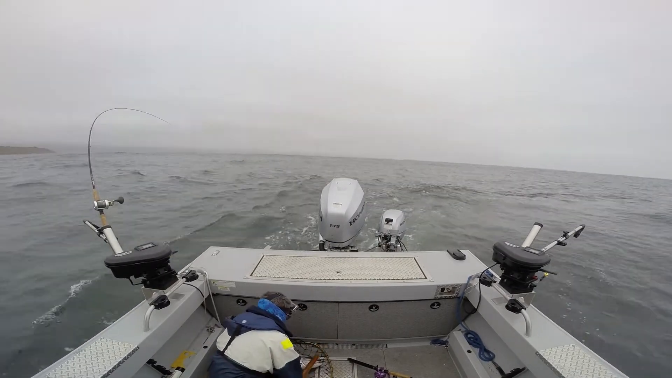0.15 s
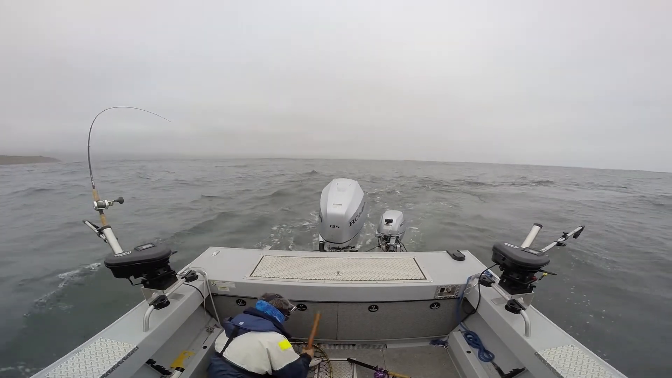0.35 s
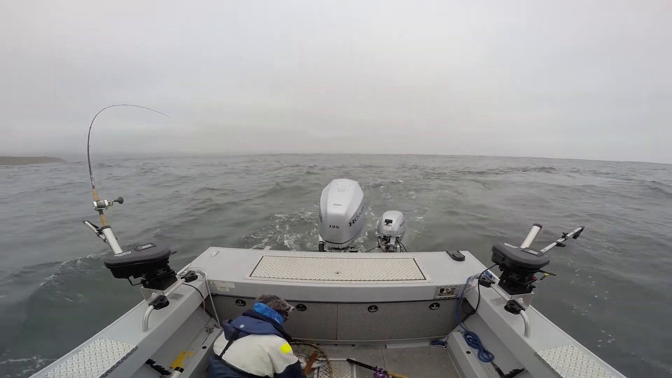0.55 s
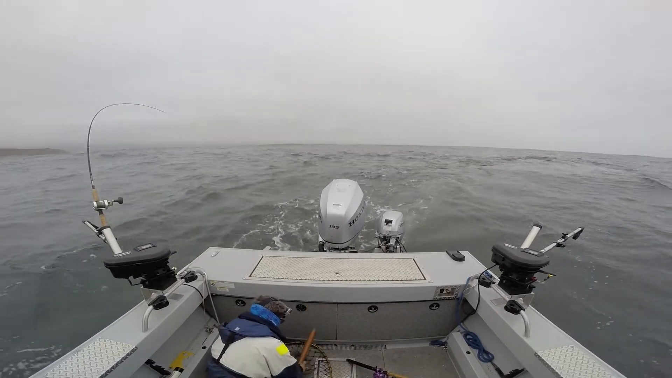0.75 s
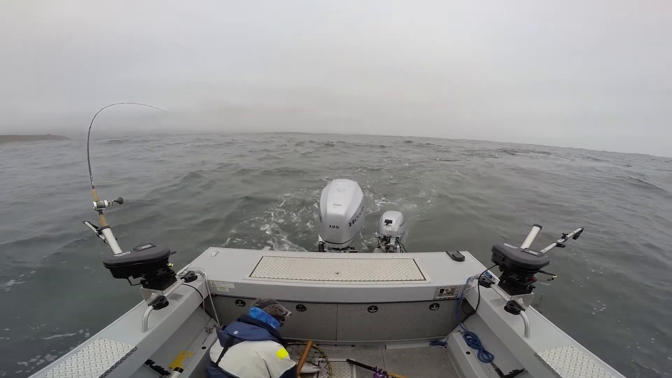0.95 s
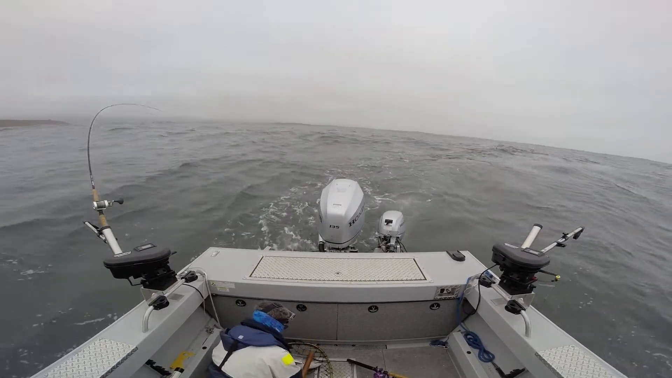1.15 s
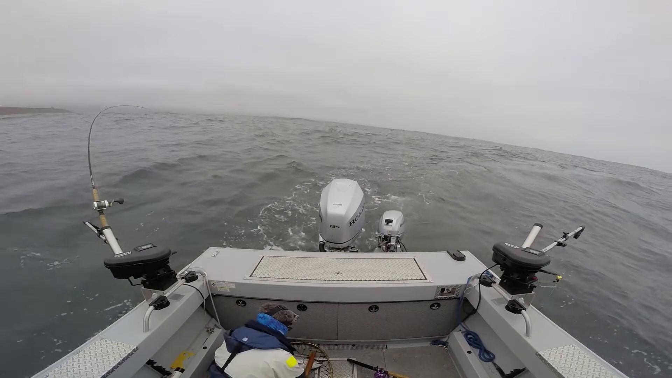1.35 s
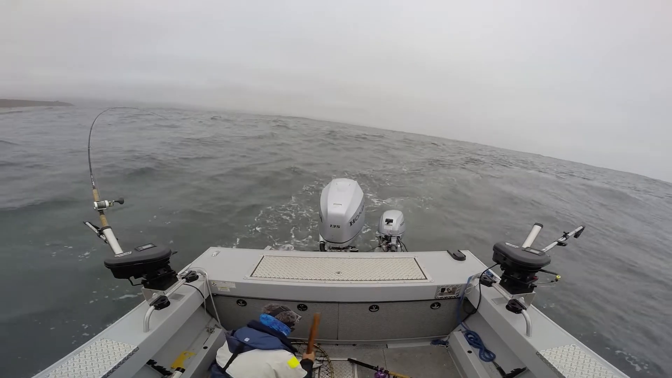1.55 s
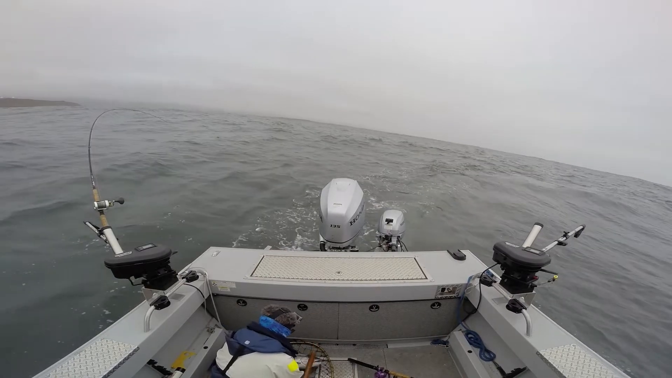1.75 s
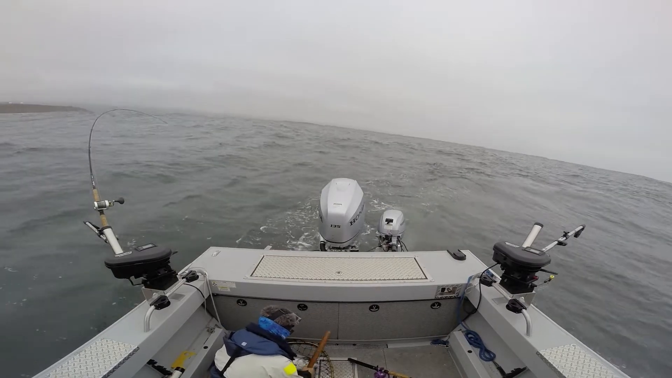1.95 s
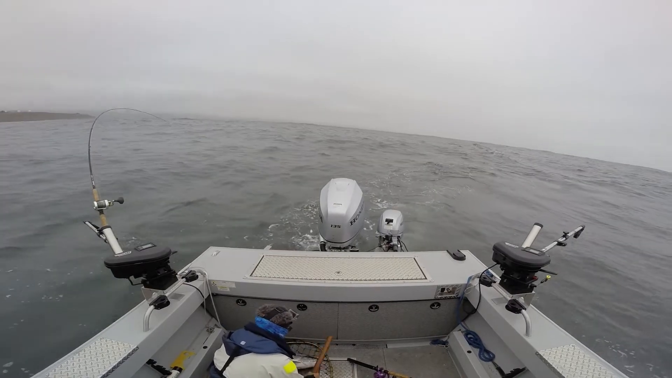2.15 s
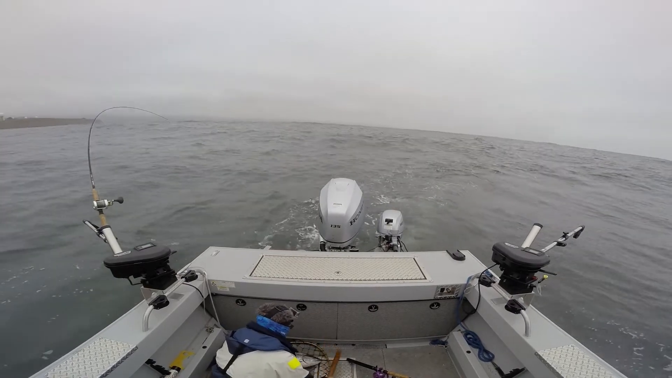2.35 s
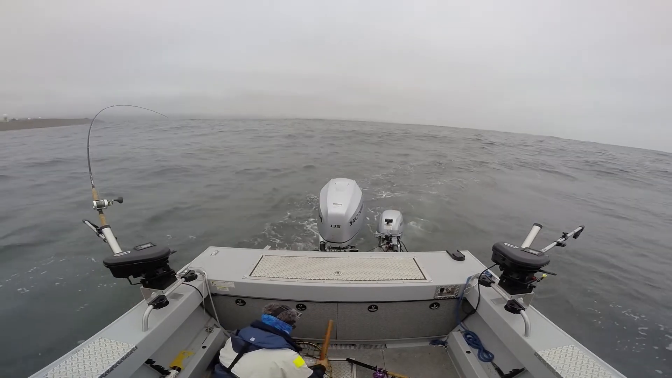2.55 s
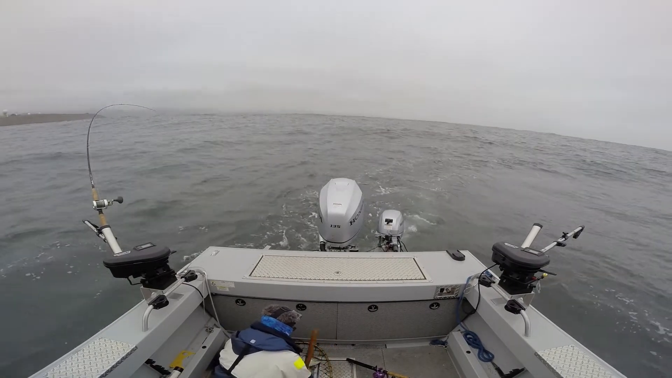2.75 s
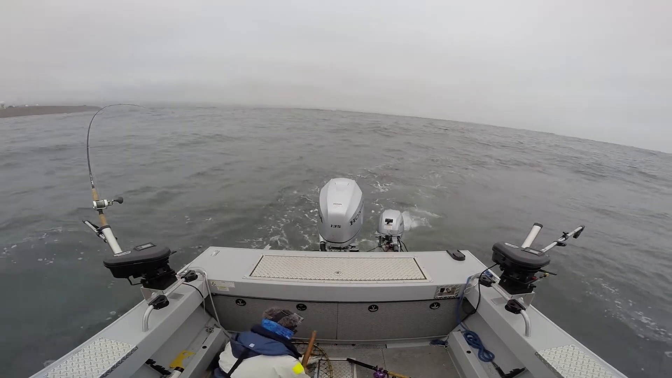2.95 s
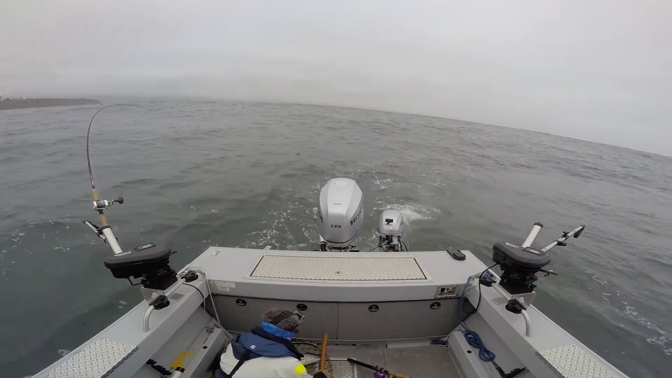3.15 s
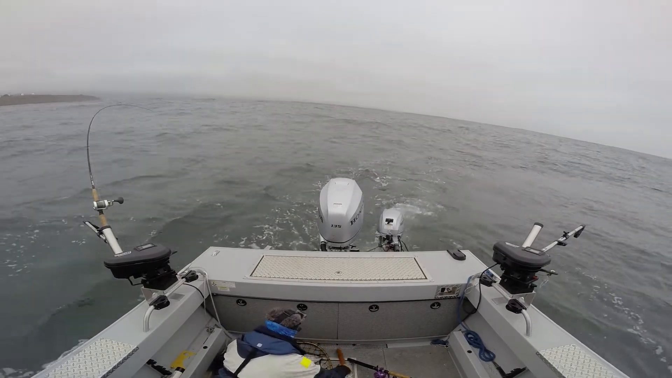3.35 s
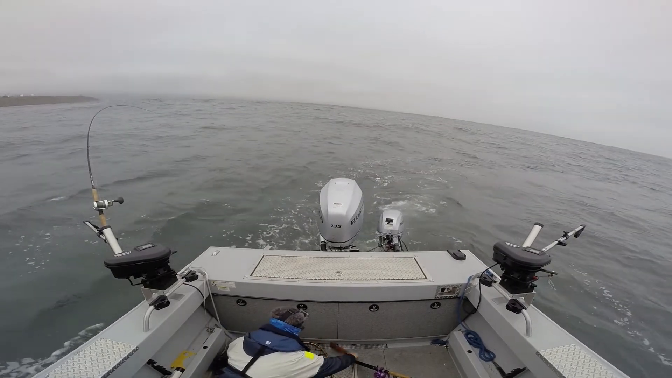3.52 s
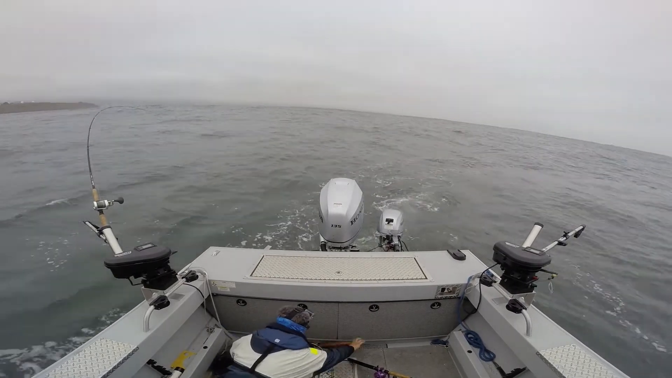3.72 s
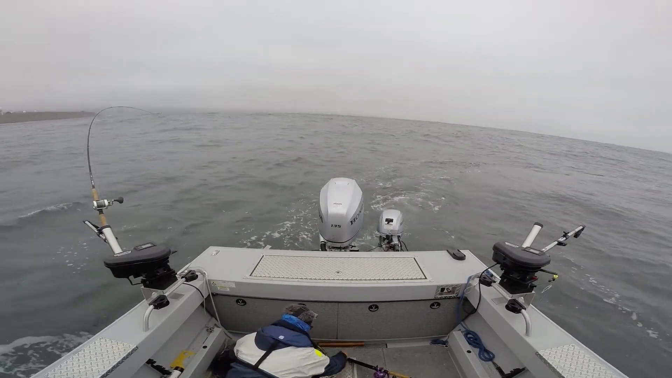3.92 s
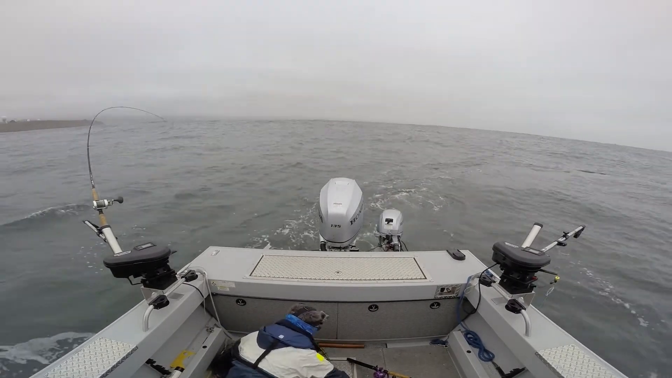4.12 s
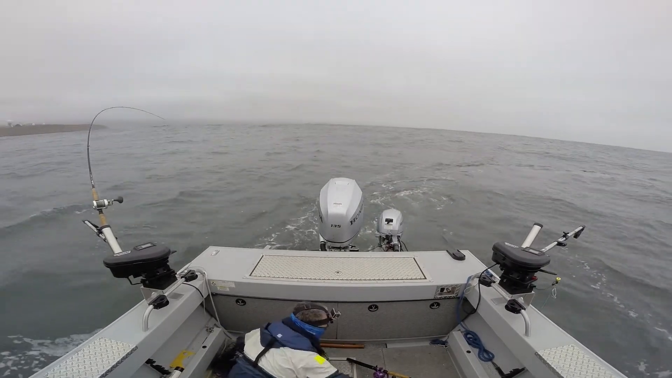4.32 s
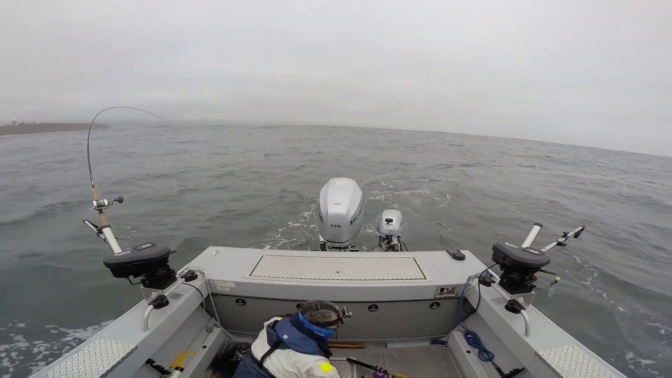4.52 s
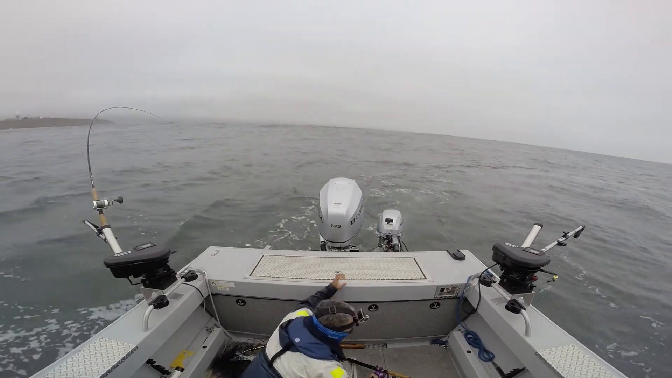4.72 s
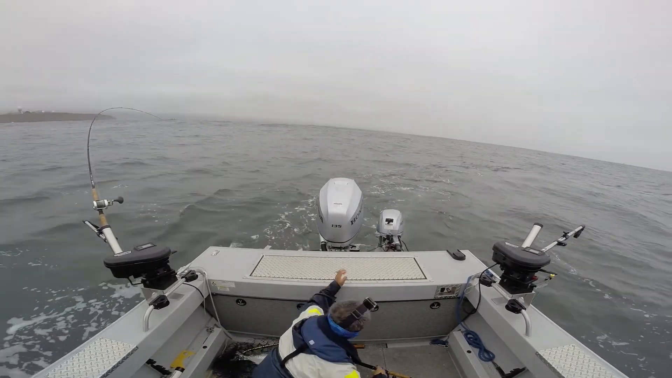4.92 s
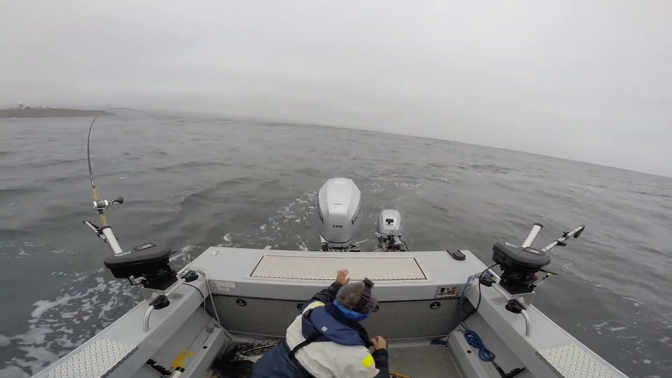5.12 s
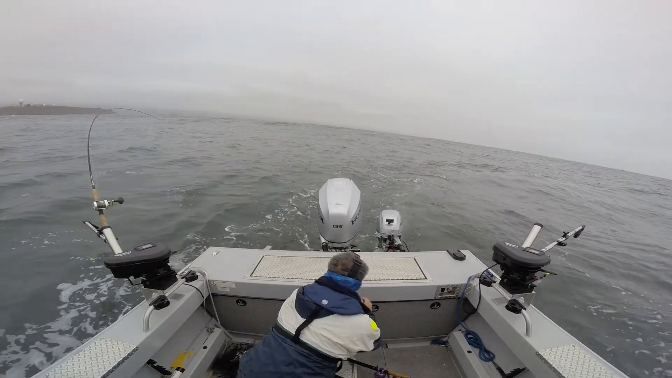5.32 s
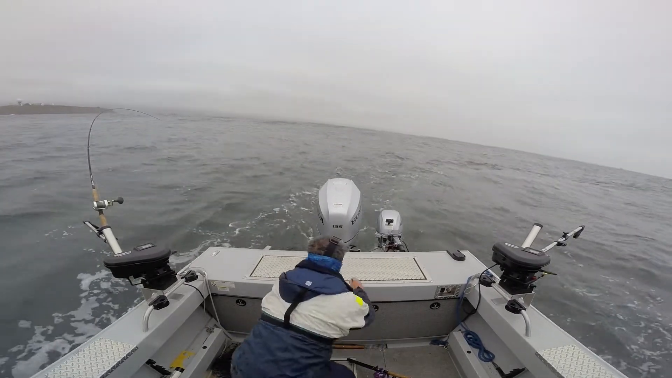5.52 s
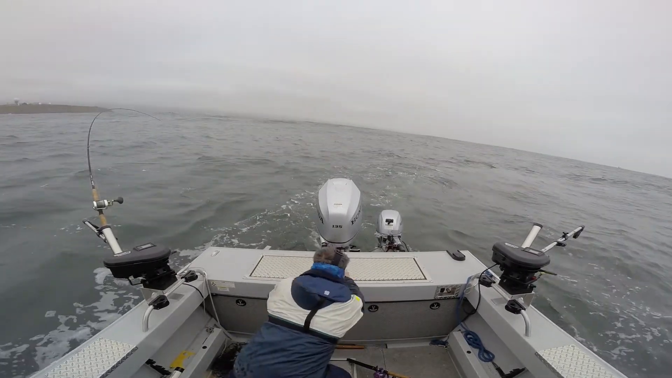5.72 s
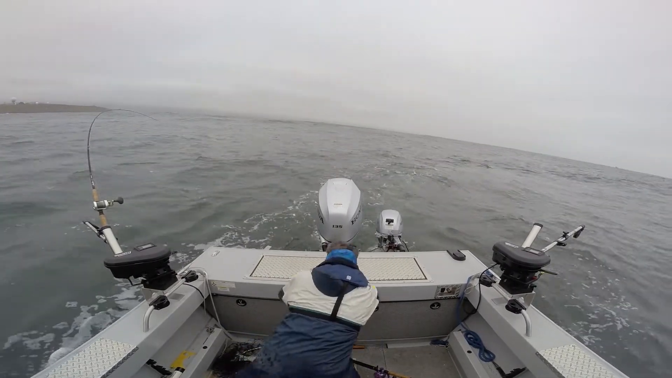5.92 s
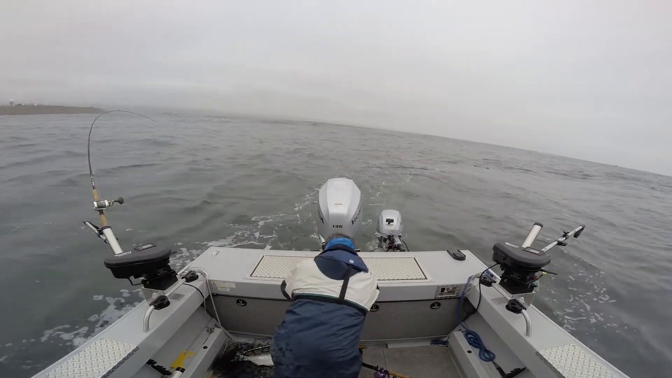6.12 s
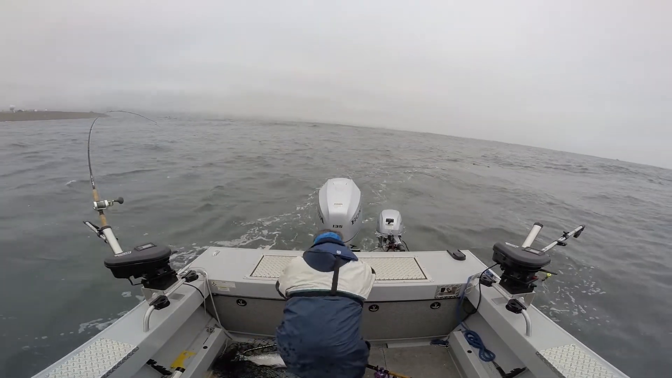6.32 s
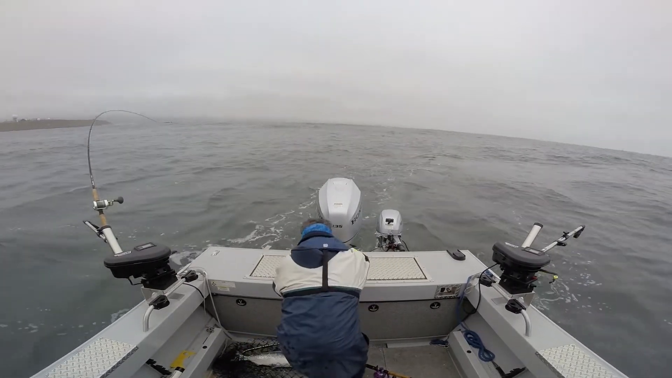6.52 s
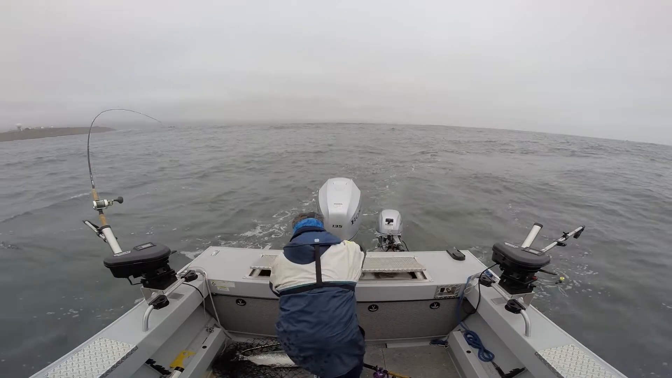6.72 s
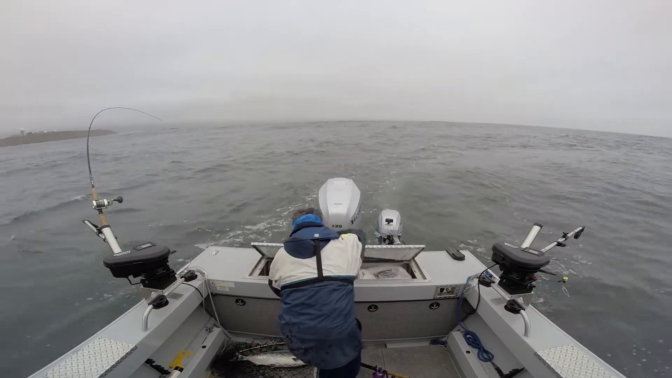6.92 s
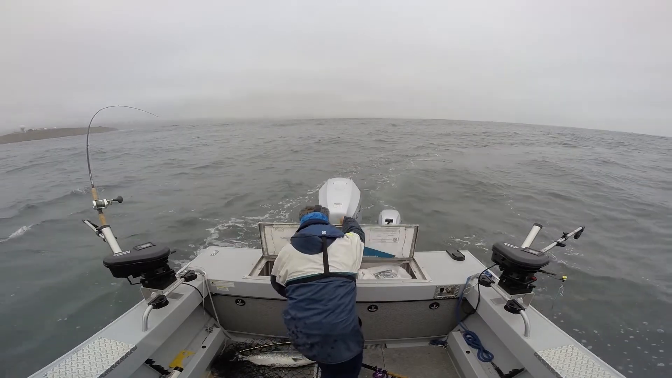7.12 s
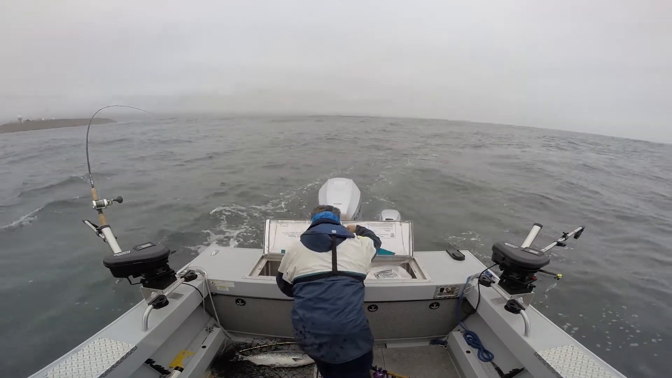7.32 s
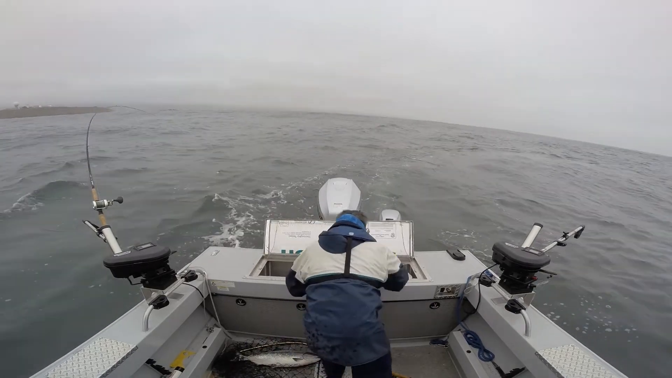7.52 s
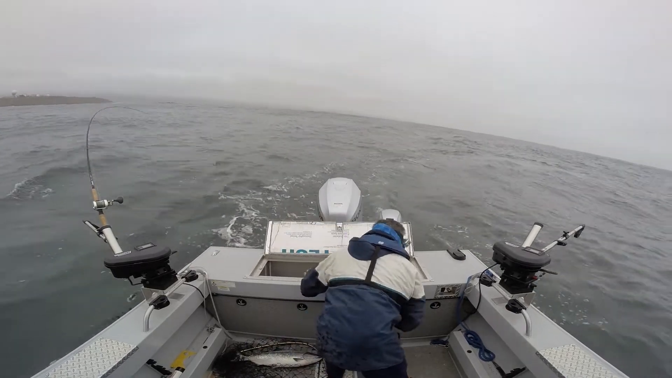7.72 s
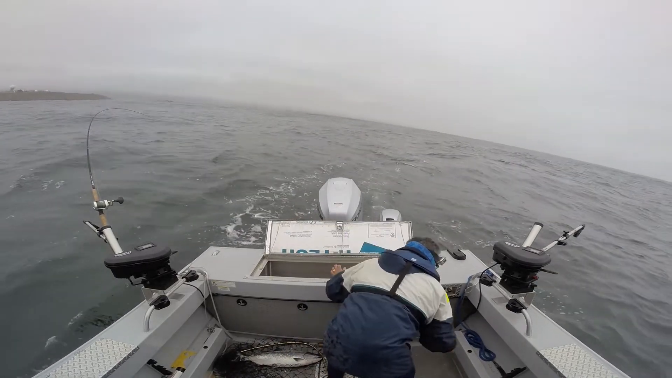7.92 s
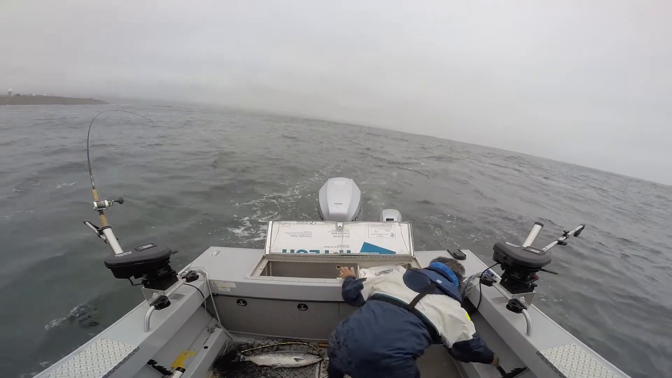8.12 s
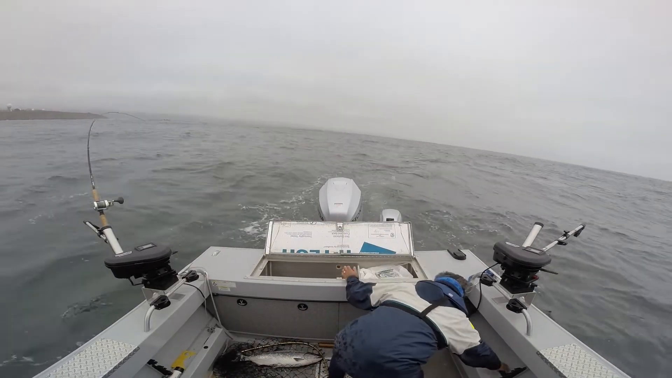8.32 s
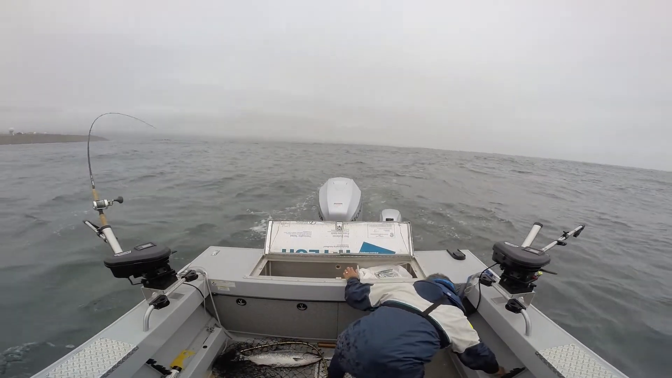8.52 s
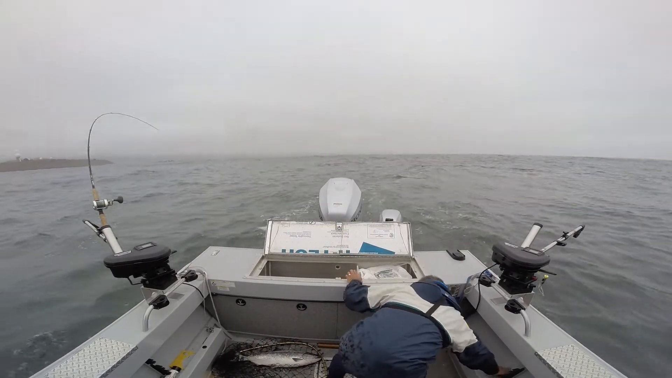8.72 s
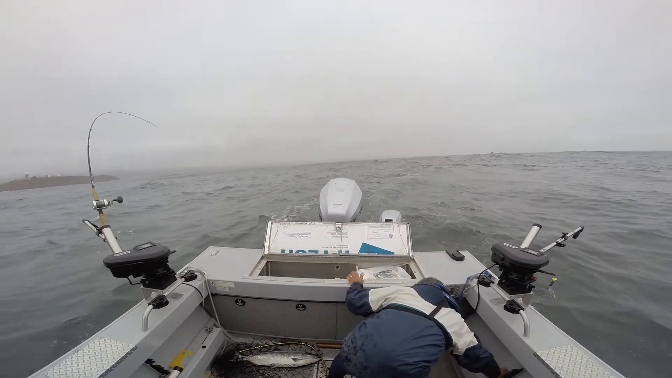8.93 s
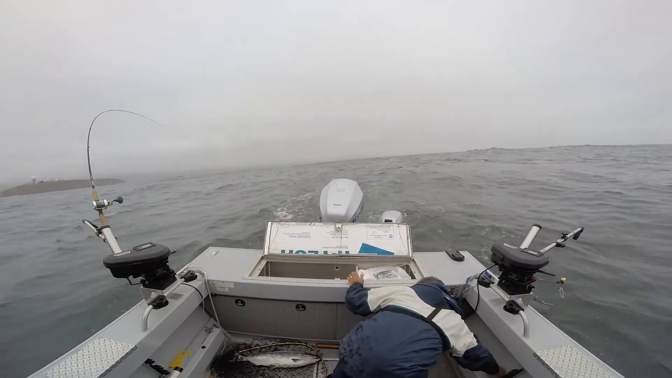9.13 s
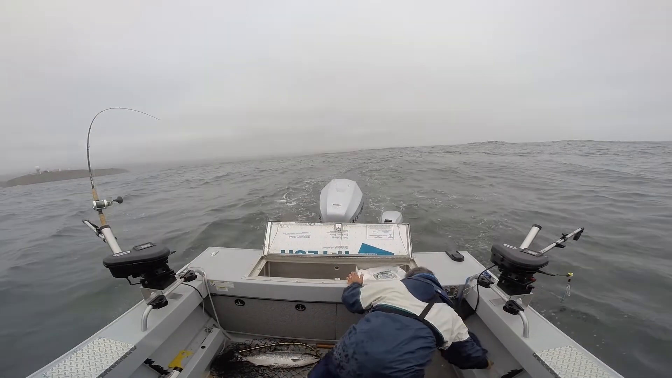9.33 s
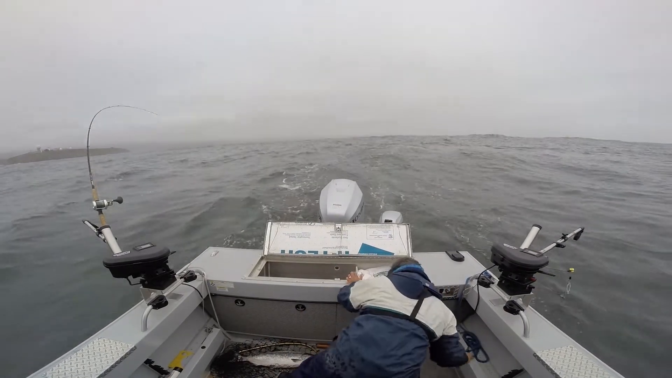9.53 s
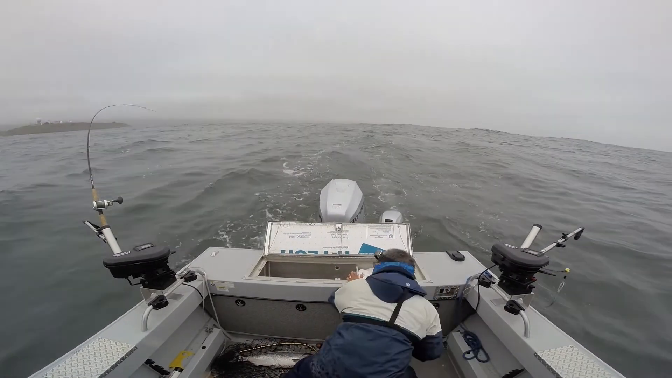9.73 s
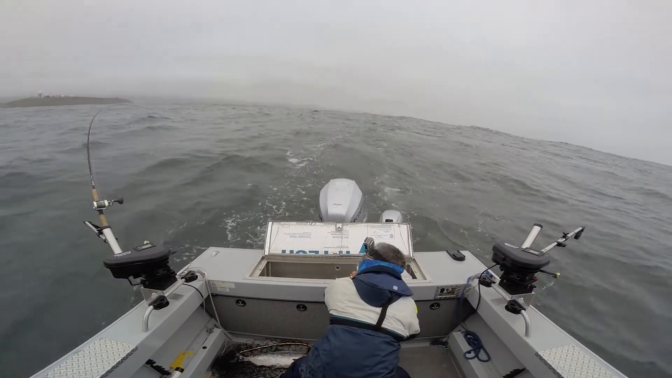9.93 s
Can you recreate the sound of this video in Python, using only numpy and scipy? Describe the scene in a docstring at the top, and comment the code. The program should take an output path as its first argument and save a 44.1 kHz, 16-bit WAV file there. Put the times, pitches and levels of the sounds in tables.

```python
"""Fishing boat, catch and stern hatch

An aluminium boat trolls at sea: a small outboard hums on its shaft orders, the hull booms, shaped noise makes
the wash and steady tones the electronics' whine. An angler strikes three blows on a netted catch and the net frame
clatters; then he drops a wooden club, gets up in a rustling jacket, opens the hatch and rummages in the gear.
Impacts are decaying modes over dense noise, with short swells for cloth and dragged gear. Nearly mono."""
import sys
import numpy as np
from scipy import signal
from scipy.fft import rfft, irfft, next_fast_len
from scipy.io import wavfile
from scipy.ndimage import map_coordinates

SR = 44100
rng = np.random.default_rng(int(sys.argv[2]) if len(sys.argv) > 2 else 0)


def log_audio(samples):
    """Write samples as a 16-bit WAV file to the path given in sys.argv[1]."""
    # one column per channel
    frames = np.atleast_2d(samples).T
    # limit to full scale, then quantise
    limited = np.clip(frames, -1, 1)
    pcm = np.round(limited * 32767).astype(np.int16)
    wavfile.write(sys.argv[1], SR, pcm)


N = 439236  # length in samples


def amp(db):
    """Decibels to gain."""
    return 10 ** (np.asarray(db) / 20)


def unit(x):
    """Scale to rms 1."""
    return x / np.sqrt(np.mean(x ** 2) + 1e-20)


def along(points, hz):
    """(Hz, dB) points read on a log frequency axis."""
    f, v = np.transpose(points)
    return np.interp(np.log(hz + 1), np.log(f + 1), v)


def curve(rows):
    """(s, value) rows as one value per sample."""
    return np.interp(np.arange(N) / SR, *np.transpose(rows))


def wobble(rate, size=N):
    """A smooth random curve through normal knots, rate knots a second."""
    knots = rng.standard_normal(int(size * rate / SR) + 4)
    return map_coordinates(knots, [np.arange(size) * rate / SR], mode="nearest")


def noise(colour, size=N):
    """Noise of rms 1 whose level in dB is a function of frequency."""
    m = next_fast_len(size)
    spectrum = rfft(rng.standard_normal(m)) * amp(colour(np.fft.rfftfreq(m, 1 / SR)))
    return unit(irfft(spectrum, m)[:size])


def fade(t, t60):
    """Free decay by 60 dB in t60 seconds."""
    return np.exp(-np.log(1000) * t / t60)


def add(track, s, sound):
    """Mix a sound into the track at time s."""
    part = track[round(s * SR):][:len(sound)]
    part += sound[:len(part)]


def resonances(modes, hz):
    """Level in dB of summed (Hz, width Hz, dB) resonances."""
    return 20 * np.log10(sum(amp(db) / (1 + (2 * (hz - centre) / width) ** 2) for centre, width, db in modes))


def swells(rows):
    """Smooth humps of gain from (s at the middle, dB, half length s) rows."""
    t = np.arange(N) / SR
    return sum(amp(db) * np.exp(-np.minimum(((t - s) / half) ** 2, 50)) for s, db, half in rows)


def ringing(modes, t, scatter_db, blur):
    """Undamped (Hz, dB) modes at new strengths; shifting contact lets their phases drift."""
    hz, db = np.transpose(modes)
    sizes = amp(db + rng.normal(0, scatter_db, len(hz)))
    steps = rng.normal(0, blur, (len(hz), len(t) // 10 + 1))  # radians, one step per 10 samples
    drift = np.repeat(np.cumsum(steps, axis=1), 10, axis=1)[:, :len(t)]
    phase = 2 * np.pi * (hz[:, None] * t + rng.random((len(hz), 1))) + drift
    return unit(sizes @ np.sin(phase.astype(np.float32)))


def rattle(size, rate, kick):
    """Gain of a part that hops at random moments, each hop a small new burst."""
    hops = (rng.random(size) < rate / SR) * rng.uniform(0, kick, size)
    bursts = signal.lfilter([1], [1, -np.exp(-1 / (0.013 * SR))], hops)
    return unit(1 + bursts)


def strikes(contacts, modes, wash, ring_db, crack_db, tail_db, tail_t60, graze_db, blur):
    """Hard contacts: a graze, a crack, clear modes over many dense ones, and a longer rattling tail."""
    lead = .012  # s of graze before the contact
    out, t = np.zeros(N), np.arange(SR // 2) / SR - lead
    after = np.maximum(t, 0)
    for s, db, bright, t60 in contacts:
        tilt = lambda hz: bright * np.log2(np.maximum(hz, 800) / 3000)  # a positive slope lifts the treble
        ring = ringing([(hz, level + tilt(hz)) for hz, level in modes], t, scatter_db=4.0, blur=blur)
        dense = noise(lambda hz: along(wash, hz) + tilt(hz), size=len(t))
        crack = 1 + amp(crack_db) * fade(after, 0.0032)
        body = dense * crack + amp(ring_db) * ring
        tail = amp(tail_db) * fade(after, tail_t60) * rattle(size=len(t), rate=70, kick=2)
        decay = fade(after, t60) + tail
        graze = amp(graze_db) * fade(np.abs(t), 0.014)  # one edge touches just before the full weight lands
        add(out, s - lead, amp(db - 5.0) * body * np.where(t < 0, graze, decay))
    return out


# Sea wash colour: pitch_hz, relative density_db (per Hz)
WASH_COLOUR = [(15, -37), (30, -6), (70, -7), (115, -7.5), (170, -20.5), (260, -9.5), (400, -17.5),
               (660, -25.5), (1100, -28.5), (2400, -26), (3400, -30.5), (5500, -37), (7000, -42),
               (10000, -47)]
WASH_TREBLE_DB = -59  # mean level of the wash between 1 and 6 kHz


def sea():
    """The wake's steady wash is shaped noise, with a fine fizz of foam above it."""
    wash = noise(lambda hz: along(WASH_COLOUR, hz))
    treble = signal.sosfilt(signal.butter(2, [1000, 6000], "band", fs=SR, output="sos"), wash)
    fizz_colour = [(3000, -40), (7000, -18.5), (8600, 14), (9600, 3.5), (12000, -5), (15000, -4)]
    fizz = noise(lambda hz: along(fizz_colour, hz))
    wash_gain = amp(WASH_TREBLE_DB + 0.44 * wobble(9.3)) / np.std(treble)
    return wash_gain * wash + amp(-71.0 + wobble(20)) * fizz


# Electronics tones: pitch_hz, level_db (rms)
WHINE_TONES = [(2907, -73), (2937, -68), (2967, -104), (8781, -65), (11687, -76), (11718, -80),
               (14625, -78.5)]


def whine():
    """Thin tones of the boat's electronics, slightly unsteady in phase."""
    t = np.arange(N) / SR
    return sum(amp(db) * np.sqrt(2) * np.sin(2 * np.pi * hz * t + .12 * wobble(15)) for hz, db in WHINE_TONES)


# Motor speed: time_s, shaft_hz
SHAFT_SPEED = [(0, 46.92), (1.4, 47.4), (4.3, 47.59), (5.8, 46.58), (9.96, 47.77)]
# Firing tone: time_s, level_db (before FIRING_GAIN_DB)
FIRING_LEVEL = [(0.0, -47.5), (0.47, -48.5), (0.91, -45.5), (1.14, -56), (1.63, -59.5), (2.27, -49.5),
                (3.1, -58), (3.85, -48), (7.16, -50.5), (7.32, -53.5), (8.76, -50), (9.96, -56.5)]
# Hull boom: time_s, level_db (before BOOM_GAIN_DB)
BOOM_LEVEL = [(0.0, -53), (0.94, -51.5), (1.36, -58), (1.83, -60), (2.02, -51.5), (2.66, -61), (3.38, -52),
              (3.88, -57.5), (4.08, -48.5), (4.69, -56.5), (5.27, -52), (6.74, -60.5), (8.88, -49),
              (9.96, -53)]
# Engine cover resonances: pitch_hz, width_hz, relative level_db
COVER_RESONANCES = [(3900, 140, -13.5), (4276, 81, 8), (5700, 100, 3)]
FIRING_GAIN_DB, BOOM_GAIN_DB = 1, -1.5


def outboard():
    """Shaft orders of the trolling motor, the boom its exhaust excites in the hull, and its valve ticking."""
    shaft_hz = curve(SHAFT_SPEED)
    turn = 2 * np.pi * np.cumsum(shaft_hz + 0.073 * wobble(5)) / SR
    shaft = amp(-53 + 0.59 * wobble(3.4)) * np.sin(turn)
    firing_gain = amp(FIRING_GAIN_DB + curve(FIRING_LEVEL) + .6 * wobble(6))
    firing = firing_gain * (np.sin(2 * turn) + amp(-18) * np.sin(4 * turn))
    resonance = noise(lambda hz: resonances([(330, 75, 0)], hz))
    seventh = .8 * np.sin(7 * turn + .8 * wobble(14))  # this order lies in the hull's resonance
    boom = amp(BOOM_GAIN_DB + curve(BOOM_LEVEL) + 2.1 * wobble(5.5)) * (resonance + seventh)
    since_tick = turn % (2 * np.pi) / (2 * np.pi * shaft_hz)  # s; one tick a turn
    cover = noise(lambda hz: resonances(COVER_RESONANCES, hz))
    ticks = amp(-70.5) * unit(fade(since_tick, 0.074) * cover)
    return np.sqrt(2) * (shaft + firing) + boom + ticks


# Jacket swishes: middle_s, level_db, half_length_s
JACKET_SWISHES = [(4.366, -57, 0.13), (5.56, -55, 0.022), (5.68, -56, 0.035), (8.25, -59.5, 0.026),
                  (9.001, -48.5, 0.03)]
# Cloth colour: pitch_hz, relative density_db (per Hz)
CLOTH_COLOUR = [(500, -28), (2000, 1), (4000, 3), (6500, -1), (8500, 4.5), (12000, -8), (15000, -9)]


def jacket():
    """Stiff cloth slides over itself in grainy swells of noise."""
    grain = amp(2.0 * wobble(76))
    return swells(JACKET_SWISHES) * grain * noise(lambda hz: along(CLOTH_COLOUR, hz))


# Deck modes: pitch_hz, relative level_db
DECK_MODES = [(68, -4), (103, -4.5), (128, -1), (160, -3), (200, -4.5), (245, -7), (290, 4), (335, 2),
              (372, 4), (430, -5.5), (520, -15.5), (610, -26), (740, -24)]


def thumps(rows):
    """Soft blows (s, dB, panel Hz, t60 s, other modes dB) ring one deck panel and the deck around it."""
    out, t = np.zeros(N), np.arange(SR // 2) / SR
    for s, db, hz, t60, deck_db in rows:
        panel = ringing([(hz, 0)], t, scatter_db=0, blur=0.097)
        deck = ringing(DECK_MODES, t, scatter_db=4.5, blur=0.12)
        soft_onset = 1 - np.exp(-t / 0.0024)
        add(out, s, amp(db) * (panel + amp(deck_db) * deck) * fade(t, t60) * soft_onset)
    return out


# Boots and knees on the deck: start_s, level_db, pitch_hz
DECK_STEPS = [(.327, -33.5, 89.5), (.991, -26, 98.5), (2.514, -37, 87), (5.145, -35.5, 96),
              (5.704, -30.5, 87.5), (7.313, -37.5, 130), (9.045, -25.5, 107), (9.249, -39, 109),
              (9.573, -37.5, 125)]
# Soft gear bumping the deck: start_s, level_db, panel_hz, other_modes_db (against the panel)
GEAR_BUMPS = [(.322, -41, 552, -6), (.983, -38, 570, 6), (.993, -32, 460, -4), (1.999, -34, 638, 6),
              (2.033, -36, 660, 9.5), (2.497, -40.5, 416, 4.5), (2.869, -35.5, 353, -20),
              (3.463, -32.5, 285, 0.5), (5.14, -40, 300, -4), (6.85, -44, 428, -6), (7.165, -32, 517, 7.5),
              (8.746, -27, 340, -25)]
FOOT_T60, FOOT_SPREAD_DB = 0.17, -6  # s; the other deck modes against the main one
BUMP_CYCLES = 37.4  # a bumped panel falls 60 dB within this many cycles


def moving_about():
    """Boots and knees thud low in the deck; soft gear bumps its smaller panels, the higher the shorter."""
    feet = [(s, db, hz, FOOT_T60, FOOT_SPREAD_DB) for s, db, hz in DECK_STEPS]
    bumps = [(s, db, hz, BUMP_CYCLES / hz, deck_db) for s, db, hz, deck_db in GEAR_BUMPS]
    return thumps(feet + bumps)


# Gear dragged over the deck: middle_s, level_db, half_length_s
GEAR_SCRAPES = [(.79, -43.5, 0.034), (4.3, -53.5, 0.045), (5.62, -57, .14), (7.03, -56, 0.012),
                (8.8, -53.5, 0.02), (9.01, -50, 0.074), (9.51, -57, 0.054)]
FIDGET_DB, FIDGET_SWING_DB = -72, 6.5  # faint shifting of the gear in between


def scrapes():
    """Sliding gear sticks and slips, which shakes the lower modes of the frame and deck plates."""
    modes = [(hz, 130, db - 9 * np.log2(hz / 3000)) for hz, db in METAL_MODES]
    slips = unit(amp(2.8 * wobble(130)))
    fidget = amp(FIDGET_DB + FIDGET_SWING_DB * wobble(8))
    return (swells(GEAR_SCRAPES) + fidget) * slips * noise(lambda hz: resonances(modes, hz))


# Small tackle clinking: start_s, level_db, pitch_hz
TACKLE_CLINKS = [(2.639, -53.5, 2160), (3.785, -41.5, 2330), (5.391, -51, 2530), (7.269, -52.5, 1840)]
CLINK_T60, CLINK_WASH_DB = 0.15, -3  # s; the dense modes against the main one


def clinks():
    """A small piece of tackle rings at one pitch over the deck plates' dense modes."""
    out, t = np.zeros(N), np.arange(SR // 2) / SR
    for s, db, hz in TACKLE_CLINKS:
        # the dense modes darken above the clink's own pitch
        dense = noise(lambda f: along(METAL_WASH_COLOUR, f) - 7 * np.log2(np.maximum(f, hz) / hz), size=len(t))
        ring = ringing([(hz, 0)], t, scatter_db=0, blur=0.12)
        add(out, s, amp(db) * (ring + amp(CLINK_WASH_DB) * dense) * fade(t, CLINK_T60))
    return out


# Hollow knocks on a locker wall: start_s, level_db
LOCKER_KNOCKS = [(4.764, -28), (8.819, -25.5)]
# Locker wall modes: pitch_hz, relative level_db
LOCKER_WALL_MODES = [(140, 2.5), (385, -1), (500, -1.5), (560, -3), (721, -6.5), (877, -14), (1320, -13.5),
                     (1990, -14), (2540, -19), (2930, -23)]
CLONK_T60, CLONK_WASH_DB = 0.08, -16  # s; dense wood modes against the clear ones


def clonks():
    """A padded knock rings the locker wall briefly, low and hollow."""
    out, t = np.zeros(N), np.arange(SR // 2) / SR
    for s, db in LOCKER_KNOCKS:
        dull = lambda hz: along(WOOD_WASH_COLOUR, hz) - 11 * np.log2(np.maximum(hz, 700) / 700)
        dense = noise(dull, size=len(t))
        ring = ringing(LOCKER_WALL_MODES, t, scatter_db=0, blur=0.12)
        soft_onset = 1 - np.exp(-t / 0.0018)
        add(out, s, amp(db) * (ring + amp(CLONK_WASH_DB) * dense) * fade(t, CLONK_T60) * soft_onset)
    return out


# Hatch moves: clack_s, clack_db (before the trim in strikes), chatter_length_s, jolt_db
HATCH_MOVES = [(7.181, -24, .016, -32), (7.535, -33, 0.057, -28.5), (7.869, -36.5, .046, -35),
               (8.096, -50, 0.032, -33)]
# Lid modes: pitch_hz, relative level_db
LID_MODES = [(1367, -48.5), (1836, -48), (2121, -51), (2498, -40.5), (3677, -48), (3833, -62), (4167, -49),
             (5701, -55), (8613, -73)]
# The lid's dense modes: pitch_hz, relative density_db (per Hz)
LID_WASH_COLOUR = [(350, -56), (600, -26), (875, -11), (1160, -25), (1380, -11.5), (1960, -14.5),
                   (2430, -2.5), (3020, -8), (3750, -5.5), (4900, -13.5), (5770, -15), (6600, -21.5),
                   (8640, -16), (15000, -36)]
CLACK_BRIGHT, CLACK_T60 = 1, 0.16  # dB per octave, s
CHATTER_DB, CHATTER_BRIGHT, CHATTER_T60 = -50, 7.4, 0.32  # dB before the trim in strikes, dB per octave, s
LOCKER_HZ, LOCKER_T60, LOCKER_SPREAD_DB = 109.6, 0.27, -4.5  # s; the deck modes against the locker's boom
JOLT_SHARE = .7  # the jolt comes this share of the chatter's length before the clack


def hatch():
    """The lid chatters on its hinges, jolts the locker below and clacks against its fittings."""
    clacks = [(s, db, CLACK_BRIGHT, CLACK_T60) for s, db, _, _ in HATCH_MOVES]
    chatter = [(s - length, CHATTER_DB, CHATTER_BRIGHT, CHATTER_T60) for s, _, length, _ in HATCH_MOVES]
    lid = strikes(clacks + chatter, LID_MODES, LID_WASH_COLOUR, ring_db=-3.5, crack_db=-7,
                  tail_db=-4.5, tail_t60=0.18, graze_db=-7, blur=0.081)
    jolts = [(s - JOLT_SHARE * length, db, LOCKER_HZ, LOCKER_T60, LOCKER_SPREAD_DB)
             for s, _, length, db in HATCH_MOVES]
    return lid + thumps(jolts)


# Knocks of the club and other gear: start_s, level_db (before the trim in strikes),
# brightness_db_per_octave, panel_hz, panel_db, wood_t60_s
WOOD_KNOCKS = [(3.624, -28.5, -2, 387, -36, 0.11), (3.904, -43, -9.5, 332, -38.5, 0.095),
               (3.9834, -12.5, -1, 367, -21.5, 0.11), (4.122, -25.5, -2, 378.5, -28, .1),
               (4.211, -48.5, -5, 397, -38, 0.12), (9.043, -47, -9, 478, -30, 0.049),
               (9.073, -37, -3, 375, -26.5, .1)]
# Club modes: pitch_hz, relative level_db
WOOD_MODES = [(738, -4.5), (1228, -2), (1403, -3.5), (1498, -11), (1764, -4), (2215, -25), (2369, 2),
              (2469, 4.5), (2810, -5), (3763, -12), (4323, -6)]
# The wood's dense modes: pitch_hz, relative density_db (per Hz)
WOOD_WASH_COLOUR = [(290, -46), (500, -10.5), (724, -22.5), (1080, -24.5), (1770, -4), (2050, -13),
                    (2230, -9.5), (3320, -16.5), (4290, -16), (5380, -31.5), (8860, -33.5), (15000, -49)]
PANEL_RINGS_LONGER, PANEL_SPREAD_DB = 1.58, -2.5  # t60 over the wood's; other deck modes against the panel


def knocks():
    """Wood knocks on a deck panel, which rings on a little longer."""
    contacts = [(s, db, bright, t60) for s, db, bright, _, _, t60 in WOOD_KNOCKS]
    wood = strikes(contacts, WOOD_MODES, WOOD_WASH_COLOUR, ring_db=-6.0, crack_db=-18,
                   tail_db=-14.5, tail_t60=0.28, graze_db=-4.5, blur=0.18)
    panels = [(s, db, hz, PANEL_RINGS_LONGER * t60, PANEL_SPREAD_DB) for s, _, _, hz, db, t60 in WOOD_KNOCKS]
    return wood + thumps(panels)


# Frame and deck plate modes: pitch_hz, relative level_db
METAL_MODES = [(1405, -15), (1762, -4), (2164, -6), (2345, -7.5), (2390, -6.5), (2611, -1.5), (3018, -2.5),
               (3456, -3), (3640, -3.5), (3770, -4.5), (3865, -8), (4015, -12), (4158, -3.5), (4242, -7),
               (4406, 0), (4465, -13), (4750, -15), (5082, -12), (5390, -18), (7025, -17), (8576, -26)]
# Their dense weak neighbours: pitch_hz, relative density_db (per Hz)
METAL_WASH_COLOUR = [(350, -24), (600, -20.5), (850, -20), (1100, -26), (1450, -9), (1900, -10), (2400, -2),
                     (3200, -4.5), (3750, -1.5), (4450, -3.5), (5100, -11), (7000, -14), (7400, -17),
                     (8600, -14), (12800, -30.5), (15000, -43)]
BLOW_T60, FRAME_T60 = 0.1, 0.14  # ring of the frame under a blow and when free (s)


def frame(contacts):
    """The net frame and deck plates ring at each (s, dB, brightness, t60) contact."""
    return strikes(contacts, METAL_MODES, METAL_WASH_COLOUR, ring_db=-3.0, crack_db=-5.5,
                   tail_db=-12, tail_t60=0.34, graze_db=-9.5, blur=0.09)


# Net frame and metal gear set down: start_s, level_db (before the trim in strikes),
# brightness_db_per_octave, second_edge_later_s, second_edge_db (against the first)
GEAR_CLATTER = [(.321, -47.5, -4, .02, -5), (1.036, -24, 3, 0.018, 1), (1.226, -44, -1.5, .014, -8),
                (2.153, -29.5, 1.5, 0.017, 2.5), (2.319, -33, 2.5, 0.014, -10),
                (3.13, -29.5, 2, .036, -10.5), (3.471, -30.5, 2, .016, -14), (5.697, -35, -3, .015, -2),
                (5.782, -48, 3, .016, -16), (8.985, -32, -10.5, 0.024, -5), (9.123, -39, -11.5, 0.016, -9),
                (9.184, -37.5, -3, .016, -10)]
SHAKE_DB, SHAKE_HZ, SHAKE_T60 = -14.5, 149, 0.24  # passed on to the deck: dB against level_db, Hz, s


def clatter():
    """Metal gear lands on one edge, rocks onto the other and shakes the deck."""
    first = [(s, db, bright, FRAME_T60) for s, db, bright, _, _ in GEAR_CLATTER]
    second = [(s + later, db + edge_db, bright, FRAME_T60) for s, db, bright, later, edge_db in GEAR_CLATTER]
    shakes = [(s, db + SHAKE_DB, SHAKE_HZ, SHAKE_T60, 3) for s, db, *_ in GEAR_CLATTER]
    return frame(first + second) + thumps(shakes)


# Club blows on the netted catch: start_s, level_db (before the trim in strikes),
# brightness_db_per_octave, boom_db
CLUB_BLOWS = [(.673, -10, 1, -23.5), (1.816, -10, 1.5, -27.5), (2.914, -12.5, 0.2, -29)]
GIVE_S, GIVE_DB, GIVE_DULLER = .012, -8.5, -3.5  # the net gives: s earlier, weaker, duller (dB per octave)
BOUNCE_S, BOUNCE_DB, BOUNCE_LOSS_DB = .05, -18.5, -8  # frame hops: flight s, first landing, loss at the next
BOOM_LEAD_S, BOOM_HZ, BOOM_T60, BOOM_SPREAD_DB = 0.00601, 115.4, 0.25, 5.5  # the deck under a blow


def blows():
    """The net gives, the full weight lands and booms in the deck, and the frame hops twice."""
    contacts, booms = [], []
    for s, db, bright, boom_db in CLUB_BLOWS:
        contacts.append((s - GIVE_S, db + GIVE_DB, bright + GIVE_DULLER, FRAME_T60))
        contacts.append((s, db, bright, BLOW_T60))
        for k in range(2):
            landing_db = db + BOUNCE_DB + k * BOUNCE_LOSS_DB
            contacts.append((s + (k + 1) * BOUNCE_S, landing_db, bright, FRAME_T60))
        booms.append((s - BOOM_LEAD_S, boom_db, BOOM_HZ, BOOM_T60, BOOM_SPREAD_DB))
    return frame(contacts) + thumps(booms)


def scene():
    """All sources reach both channels alike; only a faint hiss, opposite in the two, differs."""
    background = sea() + whine() + outboard()
    angler = jacket() + moving_about()
    gear = scrapes() + clinks() + clonks() + hatch() + knocks() + clatter() + blows()
    mid = background + angler + gear
    side = amp(-83) * noise(lambda hz: along([(100, 10), (1000, 0), (15000, -7.0)], hz))
    return np.array([mid + side, mid - side])


TOP_HZ = 15200  # band limit


def record(dry):
    """A sharp low-pass keeps nothing above the band limit."""
    m = next_fast_len(N + SR // 2)
    return irfft(rfft(dry, m) * (np.fft.rfftfreq(m, 1 / SR) < TOP_HZ), m)[:, :N]


dry = scene()
out = record(dry)
log_audio(out)
```